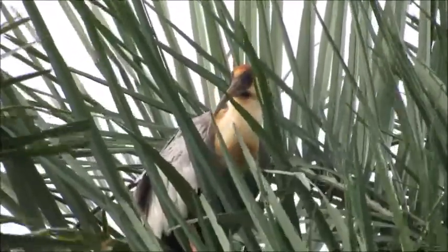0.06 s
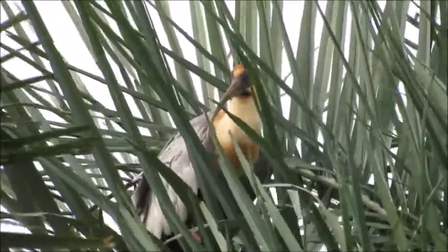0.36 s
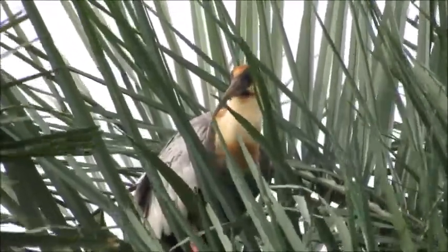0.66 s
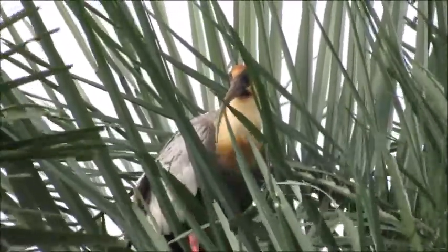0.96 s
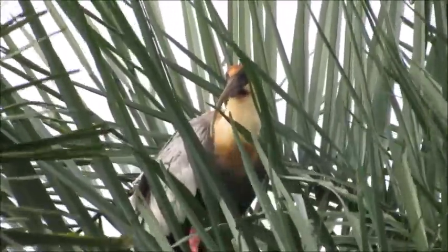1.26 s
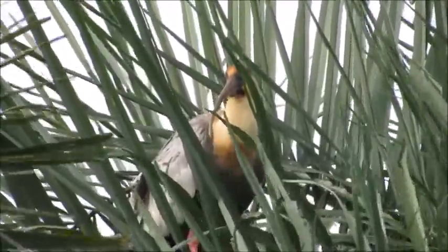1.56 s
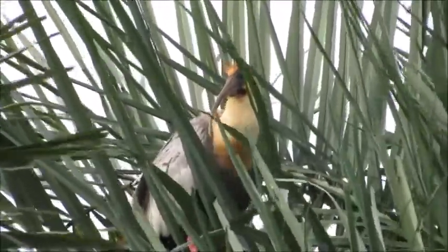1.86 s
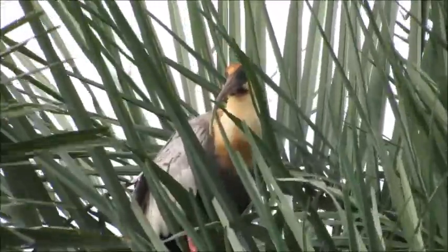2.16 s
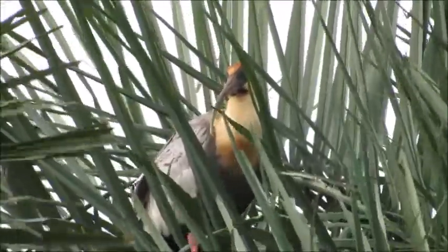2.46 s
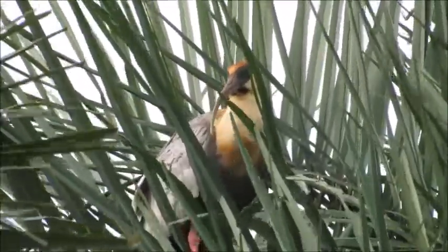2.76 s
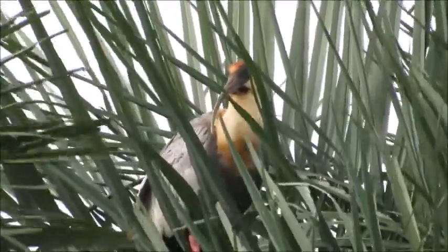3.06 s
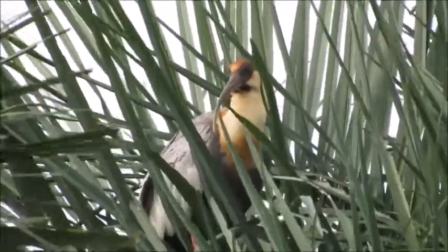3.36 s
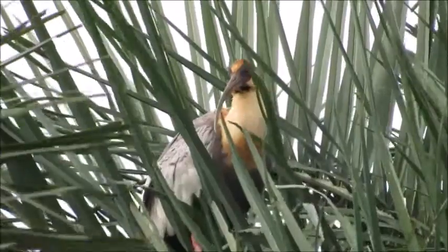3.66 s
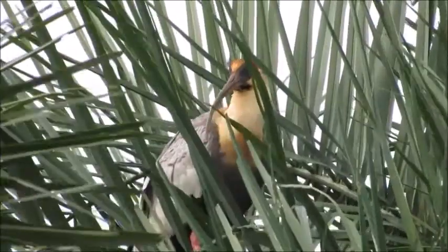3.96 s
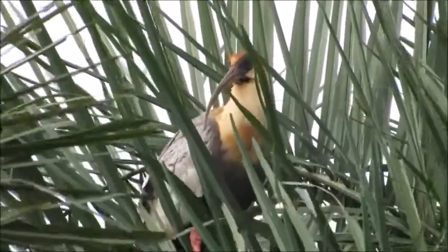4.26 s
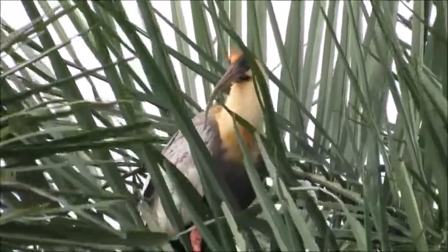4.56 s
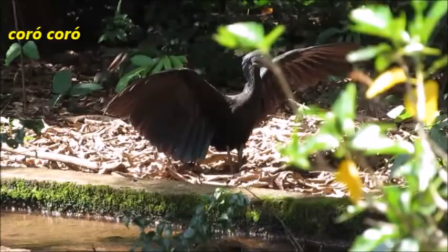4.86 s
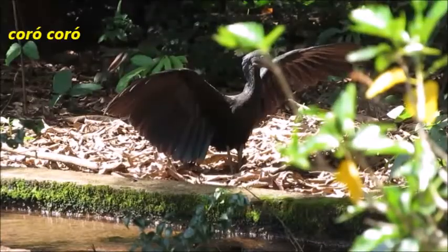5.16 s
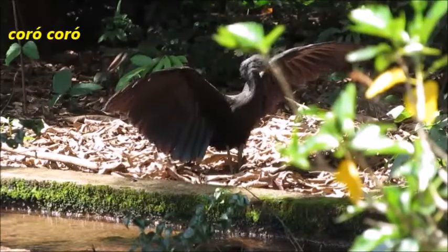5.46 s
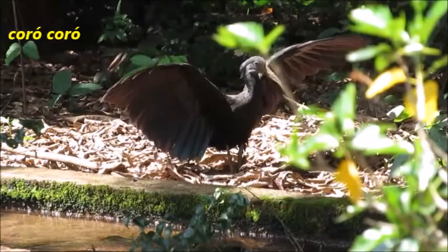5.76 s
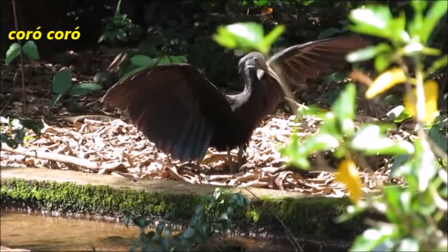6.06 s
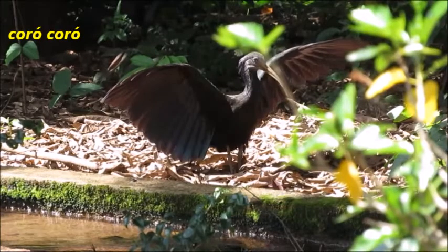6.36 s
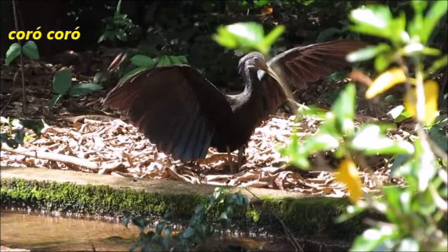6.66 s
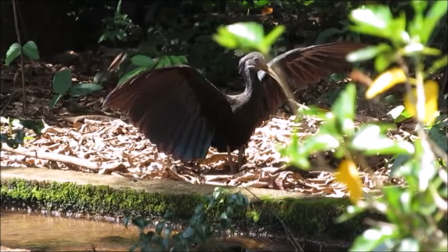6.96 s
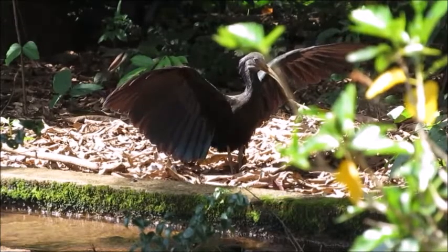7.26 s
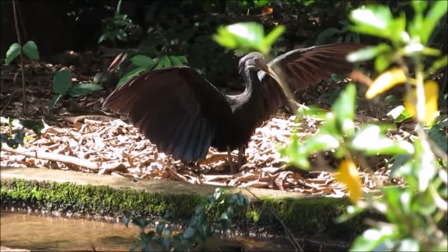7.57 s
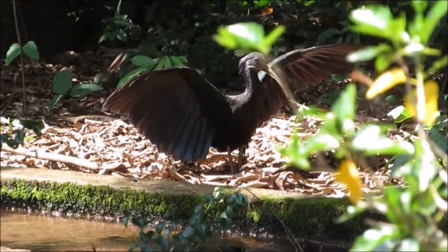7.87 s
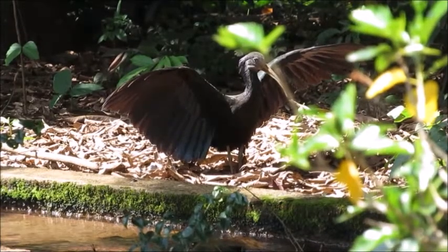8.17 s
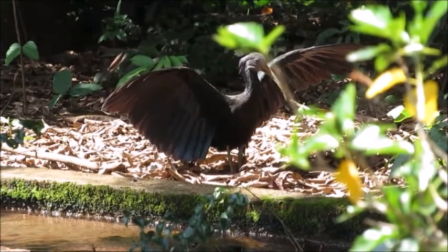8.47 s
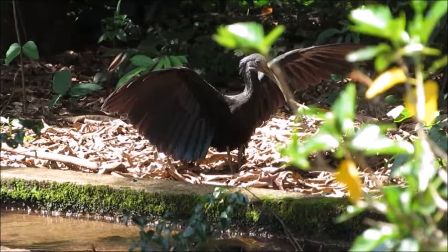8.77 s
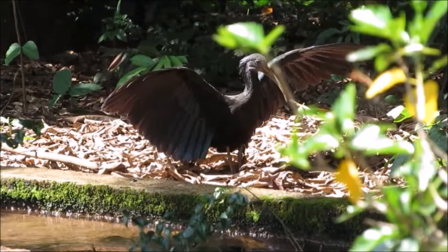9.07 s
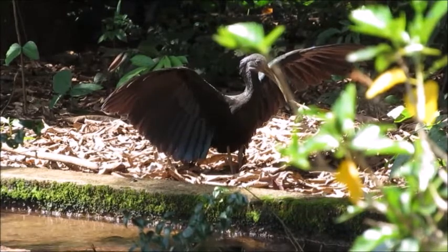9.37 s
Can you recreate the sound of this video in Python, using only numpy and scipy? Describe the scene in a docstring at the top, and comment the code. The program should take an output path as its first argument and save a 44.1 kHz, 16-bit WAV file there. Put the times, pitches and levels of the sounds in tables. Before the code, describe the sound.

Outdoors in dense foliage, leaves rustle in short brushes over a faint far-off rumble and airy hiss. Small birds close by start chirping at once and never pause: quick, high, mostly falling whistles and short peeps, lightly scattered by the leaves, with a thin babble of other birds farther off. From about 0.4 seconds a larger, more distant wading bird repeats a hoarse two-tone yelp, each a short rasp that settles into a pitch. It calls seven times, roughly every 0.6 seconds, the first faintest, ending near 4.3 seconds and staying softer than the close chirps. More brief rustles come around 1, 2 and 4.2 seconds. At about 4.8 seconds the rumble, hiss and distant babble drop abruptly. The close chirping continues, slightly softer, until nearly 10 seconds, with one faint rustle near the end.

```python
"""Leaves rustle over a far-off rumble and airy hiss, and at once small birds start chirping without pause:
quick, mostly falling whistles scattered by dense foliage, with a thin babble of others farther off.
A larger, more distant bird repeats a hoarse two-tone yelp, a throat rasp that locks into a pitch.
Halfway the yelps are over and the background drops abruptly, while the chirping goes on."""
import sys
import numpy as np
from scipy import signal
from scipy.fft import rfft, irfft, next_fast_len
from scipy.io import wavfile

SR = 44100
rng = np.random.default_rng(int(sys.argv[2]) if len(sys.argv) > 2 else 0)


def master_out(mix):
    """Clip the mix to full scale and print it as 16-bit PCM to the path in sys.argv[1]."""
    frames = np.transpose(np.atleast_2d(mix))
    ceiling = np.clip(frames, -1, 1)
    pcm = np.round(ceiling * 32767).astype(np.int16)
    wavfile.write(sys.argv[1], SR, pcm)


N = 424241
TIME = np.arange(N) / SR
DROP_S = 4.775   # rumble, air and distant flock all get quieter here
CUTOFF_HZ = 15800


def from_db(db):
    """Decibels to gain."""
    return 10 ** (np.asarray(db) / 20)


def unit_power(x):
    """Scale to an RMS of 1."""
    return x / np.sqrt(np.mean(x ** 2) + 1e-20)


def add(track, start_s, sound):
    """Mix a sound into a track from a given time."""
    at = max(0, round(start_s * SR))
    track[..., at:at + sound.shape[-1]] += sound[..., :max(0, N - at)]


def progress(length_s):
    """A ramp from 0 to 1 over the length of a note."""
    return np.linspace(0, 1, int(max(length_s, .005) * SR))


def soft_edges(u, rise, fall):
    """A gate that fades in and out over given shares of a note."""
    return np.sin(np.pi / 2 * np.clip(np.minimum(u / rise, (1 - u) / fall), 0, 1)) ** 2


def drift(rate_hz, size):
    """Smooth random modulation with a spread of about 1."""
    knots = rng.standard_normal(int(size * rate_hz / SR) + 2)
    return np.interp(np.arange(size) * rate_hz / SR, np.arange(len(knots)), knots)


def coloured_noise(eq_curve):
    """Noise of unit power shaped by an EQ curve."""
    hz, db = np.transpose(eq_curve)
    size = next_fast_len(N)
    bins_hz = np.maximum(np.fft.rfftfreq(size, 1 / SR), 1)
    gain = from_db(np.interp(np.log(bins_hz), np.log(hz), db))
    return unit_power(irfft(rfft(rng.standard_normal(size)) * gain, size)[:N])


# The crisp EQ of the leaves. Each row: frequency in Hz, gain in dB.
LEAF_EQ = [(1200, -9), (2500, -3.5), (3500, 6), (7000, 7), (9000, -9), (13000, -11), (16000, -38)]
# Cues for the rustles. Each row: start in seconds, length in seconds, relative level in dB.
RUSTLE_CUES = [(0, 0.078, -32.5), (0.133, 0.11, -33.5), (0.2, 0.41, -41), (0.589, 0.082, -33.5),
               (1.03, 0.049, -33), (1.804, 0.036, -34.5), (1.84, 0.036, -38.5), (1.923, 0.081, -42),
               (3.932, 0.022, -43), (4.201, 0.031, -29), (4.397, 0.0086, -30), (5.137, 0.12, -52),
               (6.062, 0.09, -52), (9.366, 0.049, -43)]


def rustles(grain_db=4, trim_db=-9, band_count=6):
    """Short brushes of leaves: bursts of noise in which each band crackles on its own."""
    envelope = np.zeros(N)
    for start_s, length_s, db in RUSTLE_CUES:
        add(envelope, start_s, from_db(db) * soft_edges(progress(length_s), rise=.4, fall=.45))
    noise = coloured_noise(LEAF_EQ)
    edges_hz = np.geomspace(1200, CUTOFF_HZ, band_count + 1)
    crackle = np.zeros(N)
    for band_hz in zip(edges_hz, edges_hz[1:]):
        band = signal.sosfilt(signal.butter(2, band_hz, "band", fs=SR, output="sos"), noise)
        crackle += band * from_db(grain_db * np.clip(drift(350, N), -2, 2))
    return envelope * from_db(trim_db) * unit_power(crackle)


# EQ of the rumble, and of the air before and after the drop. Each row: frequency in Hz, gain in dB.
RUMBLE_EQ = [(20, -51.5), (35, -23), (62, -4.5), (120, -5), (220, -0.5), (400, -14.5), (750, -30.5),
             (3000, -61)]
EARLY_AIR_EQ = [(300, -13), (800, -9), (1500, 3.5), (2250, -7), (3500, -2.5), (7400, -6.5), (8700, -22),
                (11000, -18.5), (16000, -18)]
LATE_AIR_EQ = [(300, -9.5), (800, -9.5), (1500, -3.5), (2250, -7), (3500, -2.5), (7200, -4), (8700, -16.5),
               (16000, -24)]


def background(early_rumble_db=-52.5, late_rumble_db=-66.5, early_air_db=-55, late_air_db=-63.5):
    """The bed: far-off rumble and wavering air, both dropping halfway, over faint microphone hiss."""
    early = TIME < DROP_S
    rumble = from_db(np.where(early, early_rumble_db, late_rumble_db)) * coloured_noise(RUMBLE_EQ)
    swell = drift(10, N)
    early_air = from_db(early_air_db + 2.9 * swell) * coloured_noise(EARLY_AIR_EQ)
    late_air = from_db(late_air_db + 2 * swell) * coloured_noise(LATE_AIR_EQ)
    hiss = from_db(-83.5) * rng.standard_normal(N)
    return rumble + np.where(early, early_air, late_air) + hiss


EDGE_S = 0.0052   # a whistle's attack and release


def whistle(length_s, pitches_hz, peak_at, fade_db=26, waver=.014, flutter_db=4.0):
    """A glide through three pitches, swelling up to the share peak_at of its length: tone and octave."""
    u = progress(length_s)
    hz = np.exp(np.polyval(np.polyfit([0, .5, 1], np.log(pitches_hz), 2), u))
    phase = 2 * np.pi * np.cumsum(hz * (1 + waver * drift(259.5, len(u)))) / SR
    swell = from_db(-fade_db * (u - peak_at) ** 2 + flutter_db * drift(178.2, len(u)))
    gate = soft_edges(u, rise=EDGE_S / length_s, fall=EDGE_S / length_s)
    octave_gain = np.exp(-((2 * hz - 12750) / 2300) ** 2)   # it carries only in one broad treble band
    return swell * gate * np.array([np.sin(phase), octave_gain * np.sin(2 * phase)])


# The small birds' main call, a whistle sliding down. Each row: start in seconds, length in seconds,
# opening pitch in Hz, closing pitch in Hz, relative peak level in dB.
SLIDE_CUES = [(0.008, 0.053, 6400.0, 4630, -38), (0.061, 0.087, 6500, 2970.0, -45.5),
              (0.106, 0.029, 6720, 5680, -34.5), (0.382, 0.052, 5340, 3010, -50),
              (0.41, 0.068, 8020, 4620, -38), (0.498, 0.079, 6710.0, 2920, -35.5),
              (0.614, 0.023, 7830, 4970, -33.0), (0.759, 0.01, 7900, 5770, -34.5),
              (0.78, 0.055, 7890, 4030, -27.5), (0.939, 0.035, 6790, 5800, -42),
              (1.161, 0.073, 6120, 2980, -37.0), (1.408, 0.051, 6040, 2500.0, -40),
              (1.55, 0.056, 7460, 4390, -35), (1.651, 0.02, 6570, 5000, -45),
              (1.721, 0.047, 6550, 4270.0, -49), (1.83, 0.022, 7200.0, 5300.0, -33),
              (2.317, 0.043, 2715, 2190, -52), (2.332, 0.038, 7530, 3830, -27),
              (2.407, 0.047, 7420, 5340.0, -35.0), (2.577, 0.016, 6760.0, 5500.0, -39.5),
              (2.618, 0.048, 6470, 4670, -33.5), (2.678, 0.029, 4040, 3060, -41.0),
              (2.772, 0.035, 6760, 5170, -39.5), (2.825, 0.035, 7270, 4190, -41.5),
              (3.013, 0.068, 7610, 3340, -30.5), (3.155, 0.058, 6170, 3160, -40),
              (3.321, 0.048, 5920, 4350, -49), (3.448, 0.039, 5730, 3640, -34.5),
              (3.576, 0.026, 5890, 4680, -32), (3.689, 0.091, 6760, 4320, -50.0),
              (4.049, 0.083, 5835, 5330, -32), (4.093, 0.019, 4490, 2660.0, -47),
              (4.131, 0.065, 8090, 4150, -32), (4.412, 0.03, 6270, 5500, -36),
              (4.549, 0.056, 7220, 4820, -29), (4.662, 0.076, 5840, 3355, -40.5),
              (4.787, 0.026, 7060, 4600.0, -44.5), (4.901, 0.082, 7820, 4280, -42.5),
              (4.95, 0.025, 6690, 5700, -33), (5.031, 0.046, 5370, 2930, -50.0),
              (5.234, 0.063, 7870, 5020, -44), (5.398, 0.031, 7200, 4000, -52),
              (5.494, 0.083, 6940.0, 4380, -41), (5.542, 0.031, 8220, 4960, -36),
              (5.649, 0.13, 7100, 5000, -52.5), (5.782, 0.055, 7280, 4560, -37.5),
              (5.905, 0.031, 7000, 3600, -54), (5.952, 0.081, 8360.0, 3420, -48.5),
              (6.188, 0.042, 7030, 2920, -54), (6.229, 0.097, 3180, 2180, -64.5),
              (6.274, 0.05, 5140, 3830, -50.5), (6.381, 0.064, 7980.0, 5080, -41.5),
              (6.475, 0.028, 6660, 5050, -42.5), (6.608, 0.049, 8200, 3630, -43),
              (6.972, 0.064, 7720, 3730.0, -45.5), (7.288, 0.074, 6410, 4840, -43.5),
              (7.403, 0.051, 8020, 4200, -34), (7.472, 0.066, 5350, 2580, -52.5),
              (7.534, 0.02, 7470, 3700, -44.5), (7.7, 0.011, 8140, 6650, -44.5),
              (7.728, 0.05, 7800, 3730, -41.5), (7.863, 0.031, 7170, 4130, -39.5),
              (8.043, 0.05, 6800, 4700, -38), (8.108, 0.079, 6270, 2640, -49.5),
              (8.287, 0.064, 6730, 6000, -44.5), (8.394, 0.056, 5050, 2470, -55),
              (8.463, 0.036, 6000.0, 4900, -44.5), (8.582, 0.046, 5850, 3560, -46.5),
              (8.731, 0.017, 7350, 6100, -38.5), (8.756, 0.063, 7660, 4550, -37.5),
              (9.076, 0.05, 8400, 4180, -38.5), (9.145, 0.024, 3830, 3020, -53.0),
              (9.243, 0.037, 7120, 5360, -54), (9.328, 0.047, 8200, 4280, -38.5),
              (9.463, 0.049, 7320, 4270, -39)]
# Their other call, a short peep that lifts to one pitch and holds it.
# Each row: start in seconds, length in seconds, held pitch in Hz, relative peak level in dB.
PEEP_CUES = [(0.47, 0.047, 6070, -32.5), (1.313, 0.031, 6240, -34.5), (2.199, 0.026, 6150, -46),
             (2.81, 0.021, 6410, -40), (2.99, 0.01, 7170, -23), (3.203, 0.053, 6070, -43),
             (3.554, 0.023, 5880, -36.5), (3.724, 0.013, 7270, -34), (4.117, 0.024, 7430, -32.5),
             (4.214, 0.013, 6720, -35), (4.714, 0.0091, 7950, -30.5), (5.759, 0.0197, 7050, -36.5),
             (6.321, 0.037, 5920, -51), (6.704, 0.013, 7710, -49.5), (6.724, 0.025, 3974, -50),
             (8.403, 0.049, 5620.0, -45.5), (9.58, 0.021, 7350, -45.5)]


def near_birds(hook_s=0.0499, hook_db=-18):
    """Close birds whistle peeps and slides that trail off in a soft hook: a tone and an octave track."""
    sag, hook_fall, lift, droop = 0.0207, .15, 0.0684, 0.0071   # bends, as shares of the pitch
    out = np.zeros((2, N))
    for start_s, length_s, start_hz, end_hz, db in SLIDE_CUES:
        middle_hz = np.sqrt(start_hz * end_hz) * (1 - sag)   # the fall is steepest at first
        slide = whistle(length_s, [start_hz, middle_hz, end_hz], peak_at=0.25)
        add(out, start_s, from_db(db) * slide)
        hook_hz = end_hz * (1 - hook_fall * np.array([0, .7, 1]))   # sinks on and flattens out
        hook = whistle(hook_s, hook_hz, peak_at=0)
        add(out, start_s + length_s - EDGE_S, from_db(db + hook_db) * hook)
    for start_s, length_s, hz, db in PEEP_CUES:
        peep = whistle(length_s, [hz * (1 - lift), hz, hz * (1 - droop)], peak_at=0.38)
        add(out, start_s, from_db(db) * peep)
    return out


def scatter(x, t60_s, build_s, uneven_db=7):
    """Foliage reverb: many small, uneven echoes off leaves and trunks build up and die away."""
    t = np.arange(SR) / SR
    reflections = rng.standard_normal(SR) * from_db(uneven_db * np.clip(drift(3000, SR), -2, 2))
    echoes = reflections * from_db(-60 * t / t60_s) * (1 - np.exp(-t / build_s))
    return signal.fftconvolve(x, echoes / np.linalg.norm(echoes))[:N]


def far_birds(count, softest_db, low_hz, high_hz, mean_length_s=0.052, range_db=8, bend=0.1392):
    """Birds farther off: a thin babble of faint falling whistles, each starting at a random pitch."""
    out = np.zeros(N)
    for slot, (when, height, loud, length, fall, arch) in enumerate(rng.random((count, 6))):
        start_hz = low_hz + height * (high_hz - low_hz)
        end_ratio = .9 - .3 * fall
        middle_ratio = np.sqrt(end_ratio) * (1 + bend * (arch - .5))
        pitches_hz = start_hz * np.array([1, middle_ratio, end_ratio])
        tone, _ = whistle(mean_length_s * (.5 + length), pitches_hz, peak_at=1)
        start_s = (slot + when) / count * N / SR
        add(out, start_s, from_db(softest_db + range_db * loud) * tone)
    return out


def resonance(x, hz, width_hz):
    """A two-pole resonance with gain 1 at its top."""
    r = np.exp(-np.pi * width_hz / SR)
    feedback = [1, -2 * r * np.cos(2 * np.pi * hz / SR), r * r]
    return signal.lfilter(np.array([1, 0, -1]) * (1 - r * r) / 2, feedback, x)


# The larger bird's throat resonances. Each row: centre in Hz, width of one filter pass in Hz, gain in dB.
THROAT_FORMANTS = [(1414, 170, 1), (1663, 72, 8)]


def throat_rasp(u, decay_db=13):
    """The hoarse attack of a yelp: fading breath noise, passed twice through each throat resonance."""
    breath = rng.standard_normal(len(u))
    rasp = sum(from_db(db) * resonance(resonance(breath, hz, width_hz), hz, width_hz)
               for hz, width_hz, db in THROAT_FORMANTS)
    return from_db(-decay_db * u) * unit_power(rasp) * soft_edges(u, rise=0.15, fall=0.37)


# Cues for the larger bird's yelps. Each row: start in seconds, length in seconds, relative level in dB.
YELP_CUES = [(0.37, 0.12, -54), (0.986, 0.097, -46.5), (1.603, 0.12, -42.5), (2.265, 0.14, -44),
             (2.907, 0.113, -44.5), (3.531, .12, -43.5), (4.142, .12, -42)]
# The contour of one yelp. Each row: share of its length, pitch ratio, relative level of the fundamental
# in dB, relative level of the octave in dB.
YELP_CONTOUR = [(0, 1.06, -12, -20), (.12, 1.025, -3, -5), (.35, .99, -1, 3), (.6, 1.02, -3, 1),
                (.82, 1.07, -3, -3), (1, 1.11, -12, -22)]


def yelping_bird(base_hz=981.3, drop_hz_per_db=4, waver=0.011, third_db=-22, tone_db=-1, rasp_db=-47):
    """Each yelp starts as a rasp in the throat, then locks into a tone that dips and rises."""
    out = np.zeros(N)
    shares, *curves = np.transpose(YELP_CONTOUR)
    mean_db = np.mean([db for _, _, db in YELP_CUES])
    for start_s, length_s, db in YELP_CUES:
        u = progress(length_s)
        pitch_hz = base_hz - drop_hz_per_db * (db - mean_db)   # stronger yelps lie lower
        ratio, fundamental_db, octave_db = (np.interp(u, shares, curve) for curve in curves)
        phase = 2 * np.pi * np.cumsum(pitch_hz * ratio * (1 + waver * drift(280, len(u)))) / SR
        overtones = np.sin(2 * phase) + from_db(third_db) * np.sin(3 * phase)
        tone = from_db(fundamental_db) * np.sin(phase) + from_db(octave_db) * overtones
        add(out, start_s, from_db(db + tone_db) * tone * soft_edges(u, rise=0.064, fall=0.0099))
        add(out, start_s - 0.014, from_db(rasp_db) * throat_rasp(u))   # equally strong in every yelp
    return out


def scene():
    """The mix: close sounds and yelps play dry plus foliage reverb; the far small birds are fully wet."""
    tones, octaves = near_birds()
    near = from_db(5) * tones + rustles()
    leaves = scatter(near, t60_s=.17, build_s=.0015, uneven_db=6)
    trees = from_db(-17) * scatter(near, t60_s=0.46, build_s=0.006)
    octave_echoes = scatter(octaves, t60_s=0.27, build_s=0.0012)
    sheen = from_db(-25.5) * octaves + from_db(-20) * octave_echoes   # arrives mostly off the leaves
    flock = far_birds(count=190, softest_db=-65, low_hz=4100, high_hz=7700)
    flock += far_birds(count=60, softest_db=-67, low_hz=2400, high_hz=4600)
    flock_boost_db = np.where(TIME < DROP_S, 8, 0)
    distant = from_db(flock_boost_db) * scatter(flock, t60_s=0.052, build_s=0.0022)
    low_voices = far_birds(count=60, softest_db=-72, low_hz=2480, high_hz=4260, mean_length_s=.075)
    farthest = scatter(low_voices, t60_s=0.09, build_s=0.0024)
    yelps = yelping_bird()
    yelping = from_db(-3.5) * yelps + from_db(-4) * scatter(yelps, t60_s=0.14, build_s=0.014)
    return (near + leaves + trees + sheen + distant + farthest + yelping + background())[None]


def record(dry):
    """A steep low-pass takes off the very top."""
    return signal.sosfilt(signal.ellip(10, .1, 80, CUTOFF_HZ, fs=SR, output="sos"), dry)


dry = scene()
out = record(dry)
master_out(out)
```